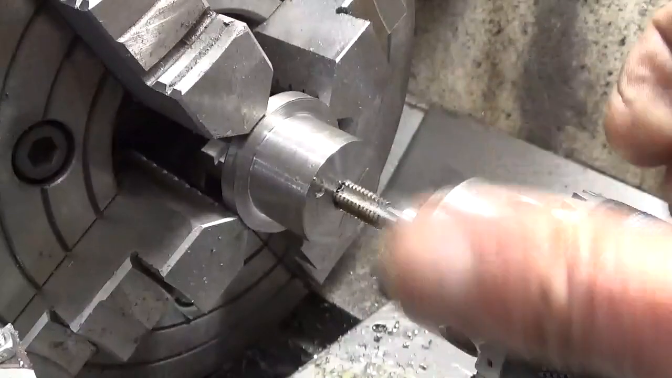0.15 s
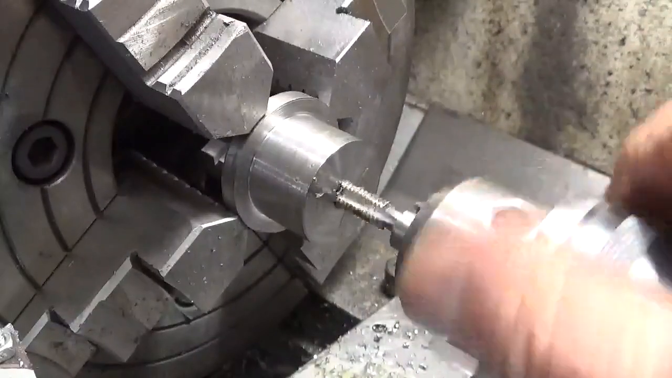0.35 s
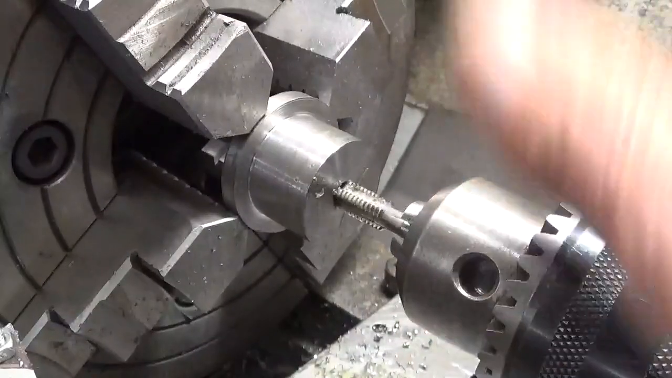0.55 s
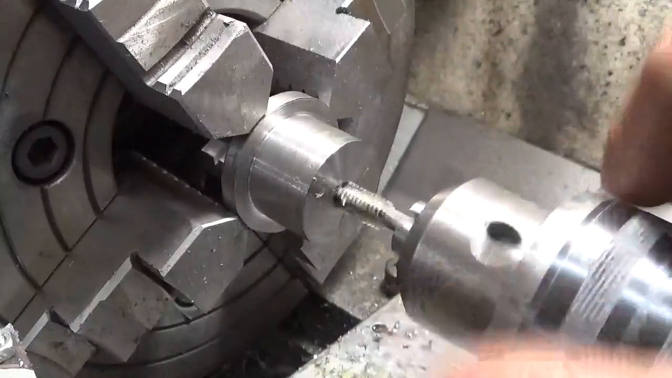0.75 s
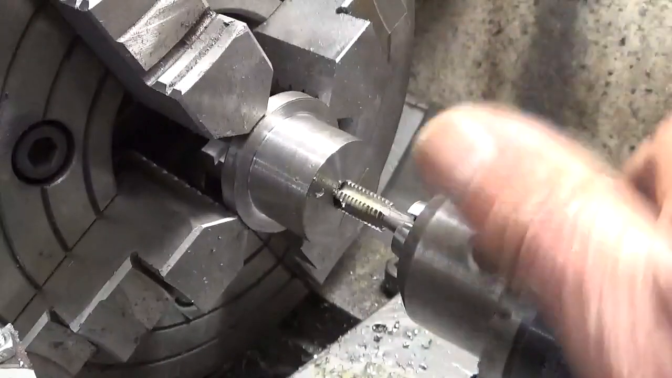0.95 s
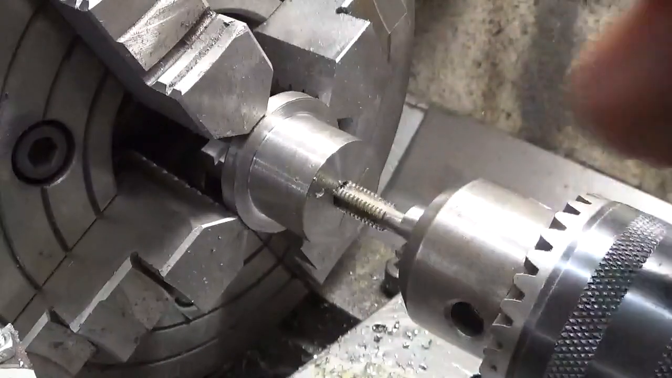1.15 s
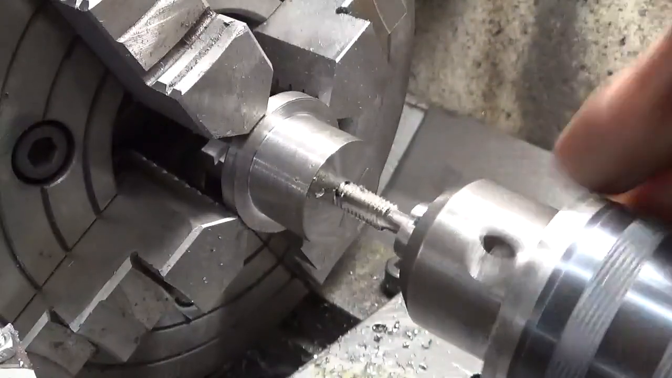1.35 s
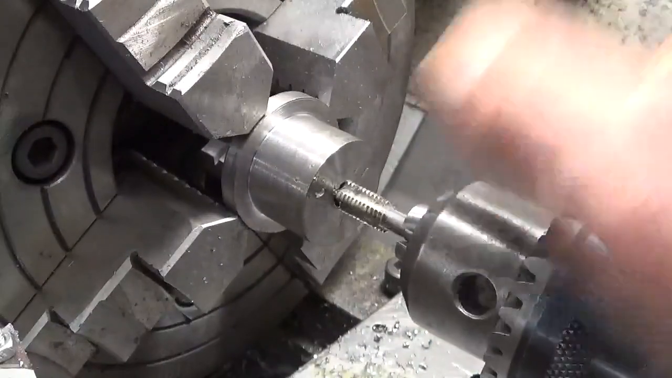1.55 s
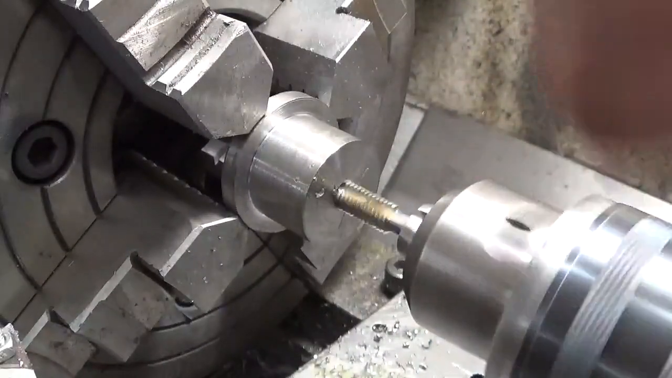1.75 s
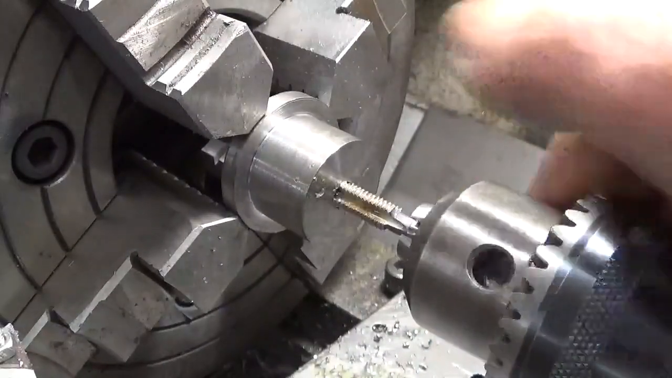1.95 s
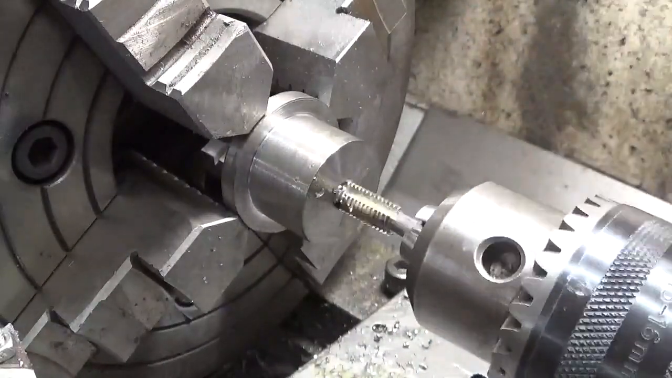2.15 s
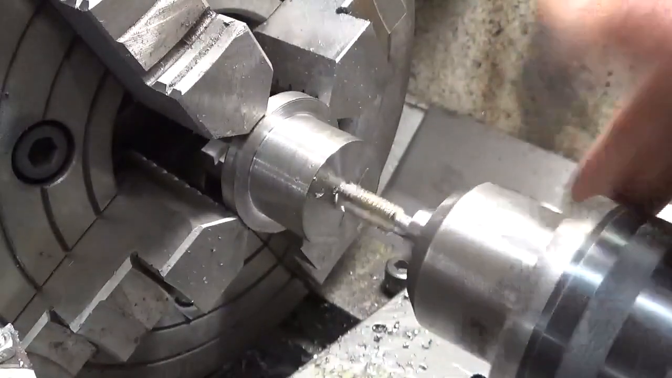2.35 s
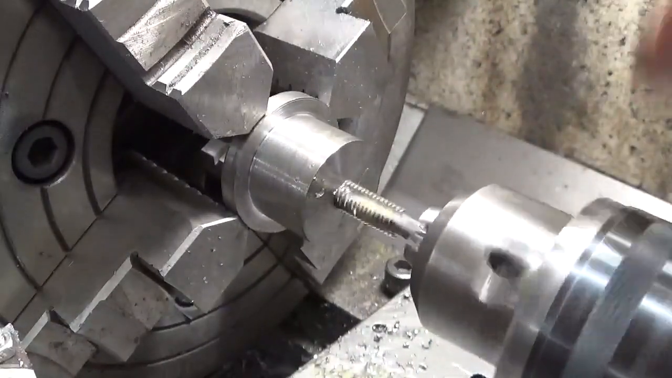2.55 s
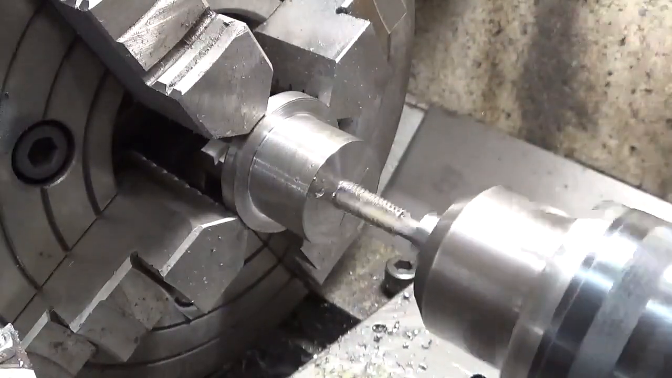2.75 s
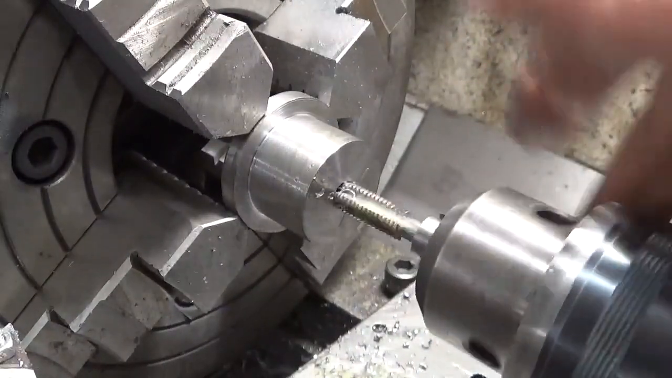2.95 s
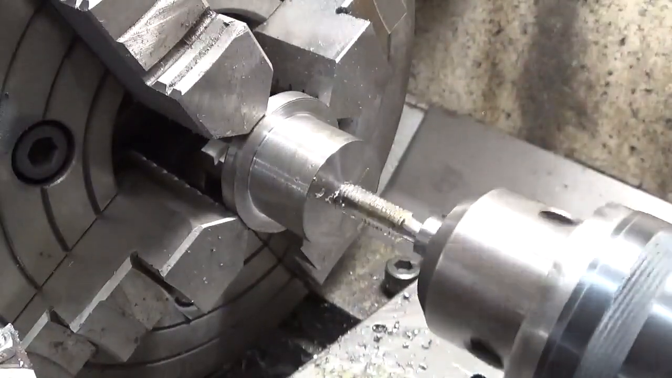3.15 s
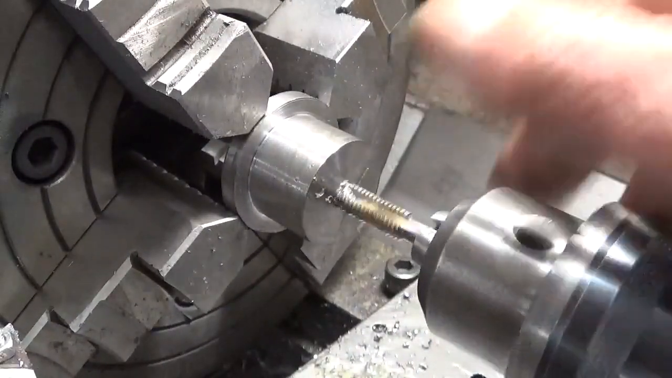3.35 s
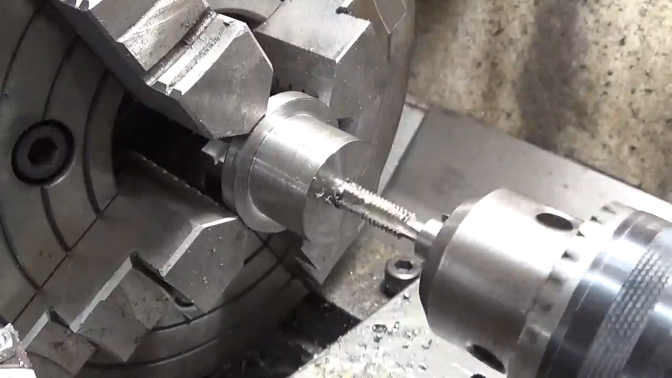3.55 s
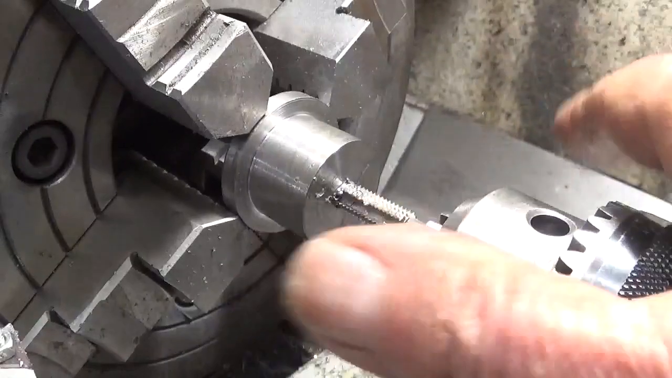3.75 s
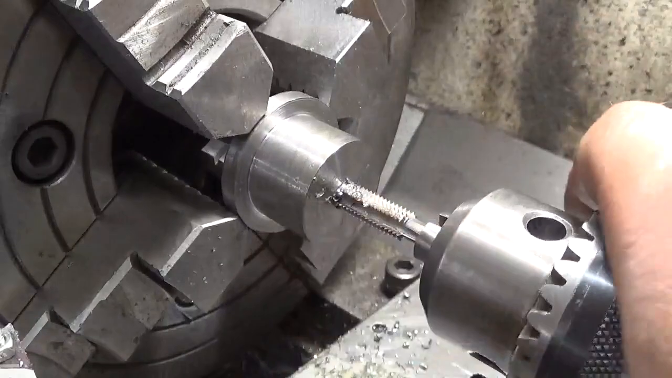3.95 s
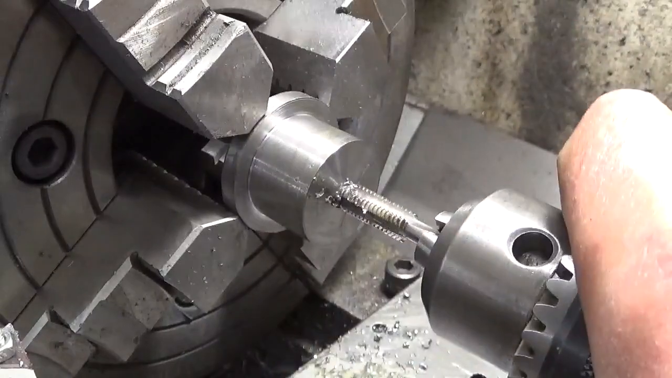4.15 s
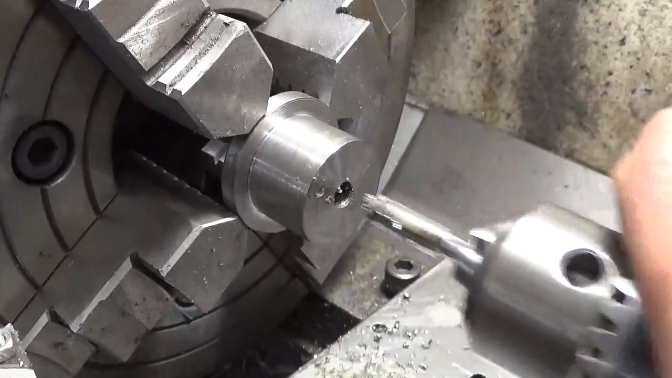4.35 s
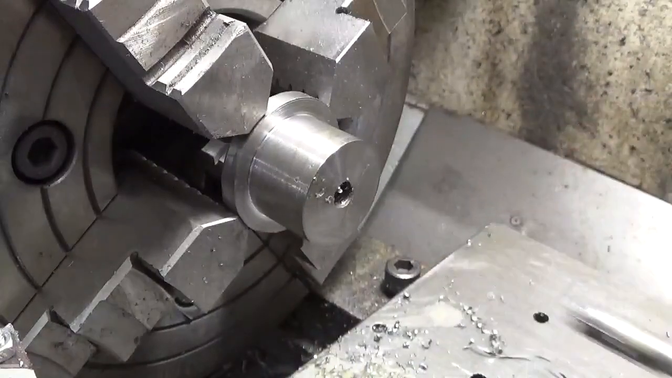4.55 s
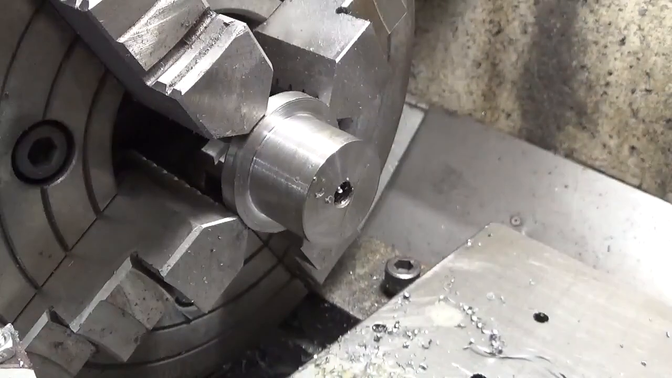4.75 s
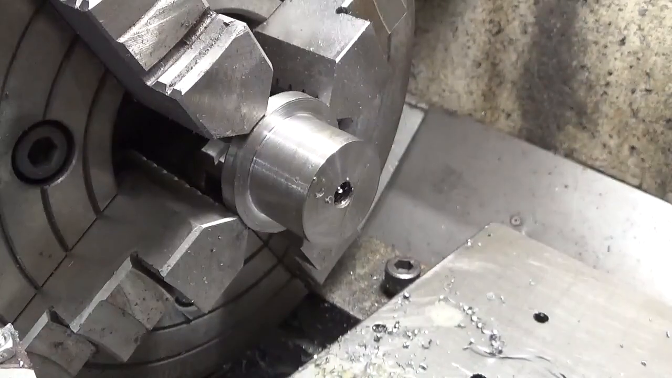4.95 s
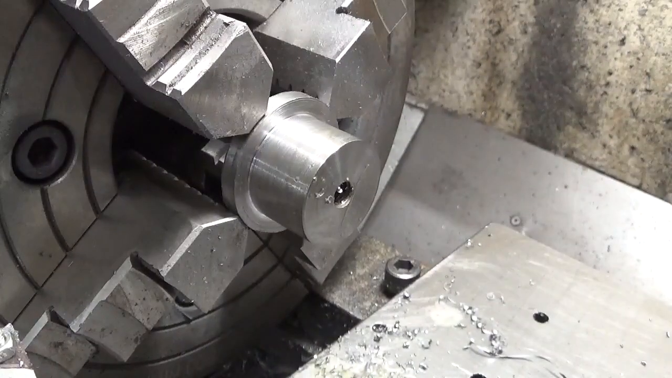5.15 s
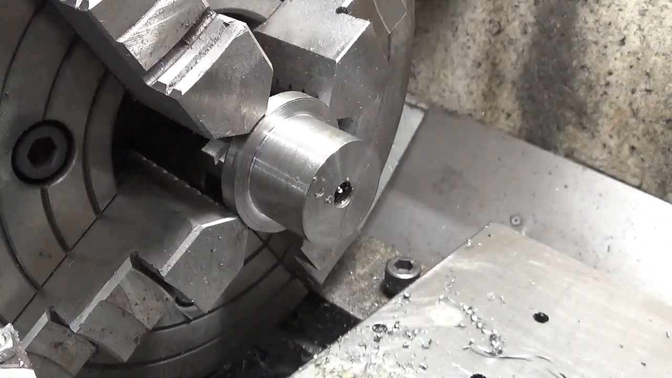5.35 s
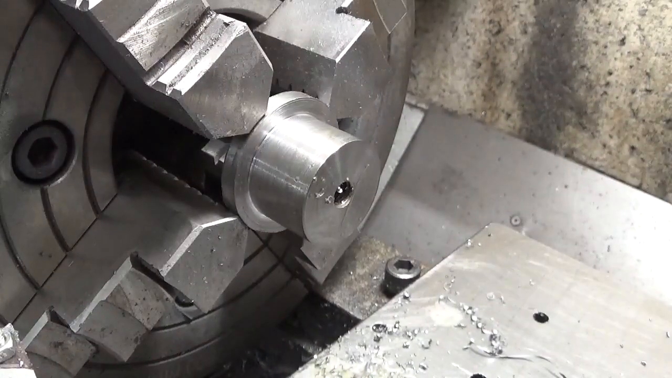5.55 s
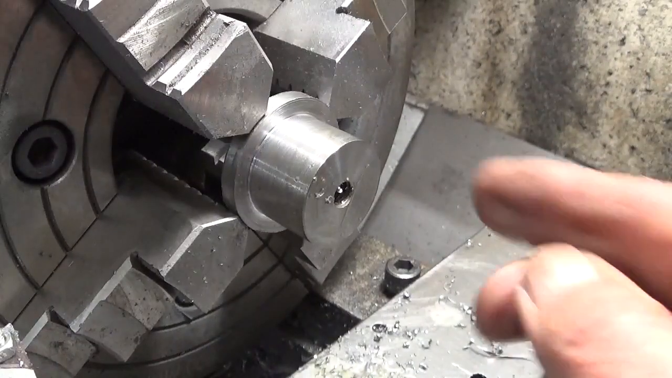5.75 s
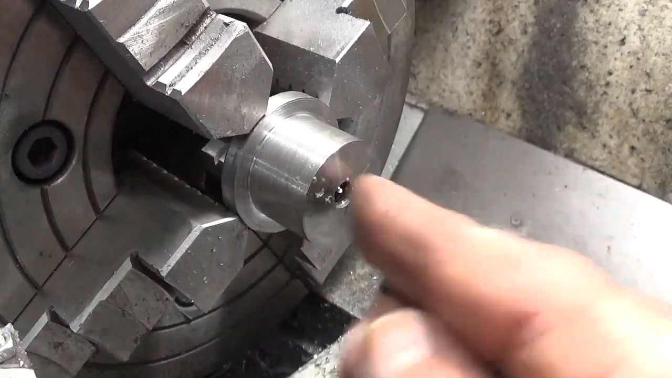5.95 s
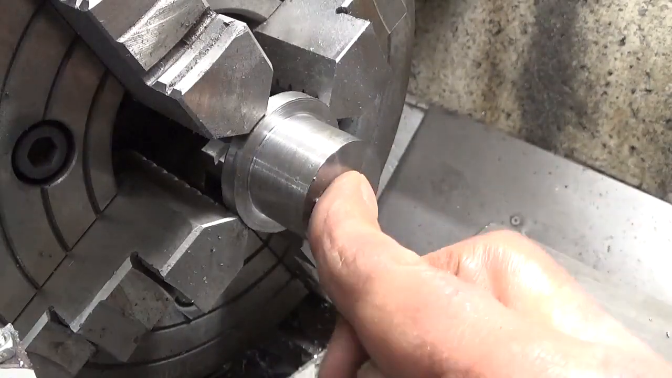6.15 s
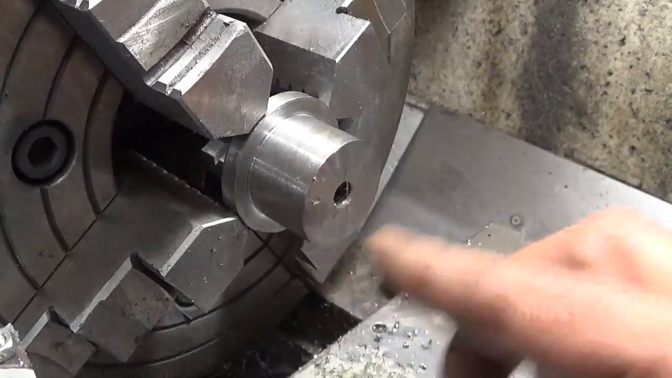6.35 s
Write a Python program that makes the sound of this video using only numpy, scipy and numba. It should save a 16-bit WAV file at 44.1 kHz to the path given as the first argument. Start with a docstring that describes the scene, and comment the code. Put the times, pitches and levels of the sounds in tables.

```python
"""A quiet workshop: fingers flick a drill chuck round to back a tap out of a part held in a lathe.
Close to a small camera, each flick slaps the steel (bursts of tiny slips ring the chuck and tap) and
rubs it (filtered grit); the tap squeaks, the machine bed rumbles and a thin whine wavers. Then the
tailstock slides away and knocks against its stop, and a finger touches the part. Air and hiss go on."""
import sys
import numpy as np
from scipy import signal
from scipy.fft import rfft, irfft
from scipy.io import wavfile
from scipy.ndimage import uniform_filter1d
from numba import njit

SR = 44100
rng = np.random.default_rng(int(sys.argv[2]) if len(sys.argv) > 2 else 0)


def master(y):
    """Save y as 16-bit WAV."""
    cut = np.clip(np.atleast_2d(y).T, -1, 1)
    pcm = np.round(cut * 32767)  # scale
    wavfile.write(sys.argv[1], SR, pcm.astype(np.int16))


def boost(x):
    """Linear amplitude factor 10**(x/20) for a level x in decibels (scalar or array-like)."""
    u = np.asarray(x, float) / 20
    return 10 ** u


N = 286550
TIME = np.arange(N) / SR
HZ = np.fft.rfftfreq(N, 1 / SR)

# A mode is one pitch at which a thing rings; its fade time is how long it takes to drop by 60 dB.
# Colour of the still air and hiss: (frequency [Hz], relative level per Hz [dB])
SHOP_COLOUR = [(15, -46), (25, -5), (70, -7), (108, 1.5), (221, -12), (317, -7), (389, -9), (420, -6),
               (490, -13.5), (931, -11.5), (2470, -14.5), (2660, -16.5), (3190, -15.5), (10600, -21.5),
               (11500, -35.5), (15000, -64), (22000, -120)]
# How alike the air is left and right: (frequency [Hz], correlation [0-1])
LIKENESS = [(130, 0.98), (270, 0.78), (580, 0.06), (1230, 0), (2600, 0.5), (5500, 0.4), (11000, 0.66)]
# Strokes of skin over steel:
# (start [s], length [s], level at start [dB], level at end [dB], hiss centre [Hz])
STROKES = [(0.0, 0.018, -47, -58, 7380), (0.03, .07, -55, -56, 7500), (0.105, 0.078, -48, -48, 7800),
           (0.222, 0.0048, -43, -45.5, 6540), (0.29, .055, -54.5, -51, 7780),
           (0.354, 0.0061, -36.5, -36, 7830), (0.4, 0.082, -53, -39.5, 8000),
           (0.5, 0.092, -45.5, -58, 7600), (0.62, 0.081, -49.5, -43, 7450),
           (0.735, 0.08, -50.5, -38.5, 8100), (0.84, .07, -58, -62, 7700), (0.93, 0.052, -60, -52, 8000),
           (1.025, .11, -45.5, -41, 6900), (1.15, 0.092, -64, -53.5, 8000), (1.3, 0.13, -42, -48.5, 7600),
           (1.415, 0.043, -48.5, -38.5, 8300), (1.512, .01, -48.5, -52, 7820),
           (1.53, 0.056, -56.5, -62, 7900), (1.62, 0.11, -48.5, -42, 6300),
           (1.75, 0.035, -49.5, -43.5, 7600), (1.8, .18, -59.5, -65.5, 8100),
           (2.005, 0.12, -45.5, -50.5, 7500), (2.14, 0.099, -57, -67, 8000), (2.295, .03, -57, -59.5, 7600),
           (2.345, 0.13, -40.5, -44, 6600), (2.47, 0.23, -50, -60.5, 8900),
           (2.68, 0.097, -54.5, -44.5, 7800), (2.79, .16, -47, -53, 7200), (2.96, .036, -56, -46, 7500),
           (3.008, 0.096, -52, -46.5, 7900), (3.1, .19, -49, -67.5, 8000), (3.38, .06, -51, -56, 7780),
           (3.445, .032, -52, -49, 7000), (3.485, 0.054, -59, -48.5, 8400), (3.545, 0.16, -56.5, -71, 7800),
           (3.788, 0.084, -61.5, -50.5, 7600), (3.914, 0.047, -50.5, -43.5, 8300),
           (4.04, 0.085, -49, -46.5, 8400), (4.35, 0.23, -69, -55.5, 7100), (4.59, 0.4, -50, -58.5, 6800),
           (5.165, .07, -63, -58, 7800), (5.36, 0.27, -65.5, -68.5, 7750), (5.72, .28, -63.5, -73, 7600),
           (6.062, .008, -50.5, -50, 7050), (6.28, 0.033, -59, -36.5, 8590)]
# A fingertip rasps over the rim of the part:
# (start [s], length [s], level at start [dB], level at end [dB], centre [Hz])
TOUCHES = [(6.052, 0.019, -47.5, -46, 3500), (6.272, .045, -50, -50, 3700)]
# Pushes that spin the chuck: (start [s], bed rumble [dB], fade as it coasts, negative swells [dB/s],
# drone above the rumble [dB], grind above the rumble [dB])
PUSHES = [(0.0, -42, 133, 4, -8), (0.198, -47, 80, 5.5, -2.5), (0.4, -49.5, 3, -1, -5),
          (0.505, -40.5, 136, -10, -4.5), (0.633, -49, 53, 1.5, -6), (0.838, -44, 147, 0.5, -2),
          (1.005, -38.5, 145, 3, -4), (1.115, -42.5, 130, 2.5, -7.5), (1.31, -43, 117, 2, -5),
          (1.43, -53.5, 70, 4.5, -0.5), (1.61, -56, -8, -0.5, -2), (1.77, -48.5, 200, -7, -6),
          (1.87, -56, 100, -1, -8.5), (2.005, -49, 69, 14, 1.5), (2.1, -52.5, 82, 6.5, -4),
          (2.345, -37.5, 130, 3, -4.5), (2.475, -47, 64, -5, -12), (2.675, -36.5, 47, -3.5, -12.5),
          (2.82, -39.5, 15, -8, -14), (2.925, -35, 76, -8.5, -20), (3.085, -42, 108, -6.5, -12.5),
          (3.2, -54, 33, -4, -7.5), (3.369, -41, 100, -3, -7), (3.46, -49, 104, -11, -3),
          (3.55, -56.5, 14, -12, -1.5), (4.16, -54, 150, -5, -10)]
# Squeaks of the tap: (start [s], length [s], level at start [dB], level at end [dB], pitch [Hz])
SQUEAKS = [(0.012, .005, -46, -50, 3260), (0.055, .08, -58, -65, 3070), (0.218, 0.0046, -56, -53, 3220),
           (0.362, .006, -49.5, -50, 3260), (0.5, 0.081, -43.5, -65, 3070), (0.65, .006, -56, -53, 3180),
           (0.845, .05, -54, -71, 3070), (1.005, .1, -54, -60, 3070), (1.122, 0.032, -48, -69, 3040),
           (1.457, .006, -50, -49, 3030), (1.72, .06, -61, -60, 3070), (1.78, .04, -55, -64, 3070),
           (2.01, .07, -57, -70, 3070), (2.102, 0.046, -55, -62, 3080), (2.338, .06, -47, -61, 2900),
           (2.41, 0.074, -60, -53, 3070), (2.485, 0.083, -53, -68, 3100), (2.69, 0.1, -54, -49, 3020),
           (2.81, .03, -48, -50, 3150), (2.87, .02, -39, -55, 2960), (2.91, .16, -50, -51, 3195),
           (3.088, .008, -46, -43, 2900), (3.128, 0.018, -47.5, -51.5, 2900), (3.178, .01, -55, -54, 2880),
           (3.36, .04, -51, -58, 2900), (3.415, .012, -52, -51, 2900), (3.54, .03, -53, -55, 3150),
           (3.594, .006, -42, -47.5, 3005)]
# Modes of the machine bed: (frequency [Hz], relative level [dB], fade time [s])
BED = [(183.5, 1, 0.093), (229.5, 2.5, 0.036), (310, -1.5, 0.094), (346, -2.5, 0.085), (433.4, -0.5, 0.041),
       (486.8, -5, 0.11), (553, -5, 0.057), (618, -9.5, 0.038), (716, -8.5, 0.04), (964, -16, 0.071)]
# Modes of the chuck, which the hand damps at once: (frequency [Hz], relative level [dB], fade time [s])
CHUCK = [(798, 2, 0.022), (1268, 3.5, 0.022), (1580, 13.5, 0.011), (1899, 6, 0.013), (2233, 3, .01),
         (2810, 0.5, 0.0024), (3260, 5.5, 0.009), (3950, 6, 0.0028), (4380, -4.5, 0.0072),
         (5415, -4.5, 0.0074), (5660, -2, 0.0065), (7100, 8, 0.0037), (7400, -12.5, 0.0027),
         (8300, 11.5, 0.0022), (9190, -8, 0.0021), (10110, -13.5, 0.0019)]
# Modes of the tap, which rings on freely: (frequency [Hz], relative level [dB], fade time [s])
TAP = [(1585, -9, 0.15), (2928, -6, 0.07), (3070, 4.5, 0.12), (3225, -18, 0.06)]
# Thumps that ring the bed:
# (time [s], peak [dB], two lowest modes above that [dB], hardness [dB/octave])
THUMPS = [(0.009, -35, 3.5, 10), (0.174, -26, -30, 12), (0.45, -35.5, -16, 15), (0.5, -23.5, -13, 9),
          (0.809, -27.5, -4.5, 5), (0.993, -31, -3, 0), (1.123, -38, -18, 15), (1.299, -36.5, 3.5, -10),
          (1.442, -43, -11, 11), (1.779, -44, -7, 6), (1.991, -22, 4.5, -16), (2.328, -28, -1.5, 5),
          (2.449, -32.5, -18, 15), (2.661, -19, 2.5, -4), (2.76, -27.5, 2, 5), (2.856, -18.5, -2.5, 9),
          (2.991, -34, 1.5, -19), (3.36, -28.5, -1, 5), (3.469, -45, -5, 4), (4.578, -7.5, -39, 19.5),
          (4.585, -7.5, -36, 10), (4.611, -16, -23, 1), (4.665, -18, -16, 7), (6.322, -45, -7.5, 24)]
# Slow jolts up through the stand: (time [s], peak [dB], pitch [Hz])
JOLTS = [(0.009, -32, 101), (0.309, -38, 78), (0.45, -41, 59), (0.609, -40.5, 89), (0.809, -35.5, 92),
         (0.992, -37.5, 113), (1.123, -35, 54), (1.299, -40.5, 35), (1.442, -48, 70), (1.779, -41.5, 71.6),
         (1.991, -24, 130), (2.111, -35.5, 59), (2.328, -35, 126), (2.449, -39, 73), (2.66, -30, 108),
         (2.76, -42, 48), (2.991, -35.5, 105), (3.068, -40, 35), (3.469, -44, 48)]
# Contacts on steel: (time [s], peak near 3 kHz [dB], low ring above that [dB],
# high ring above that [dB], contact length [s])
CONTACTS = [(0.0108, -24.5, -33, 9, 0.003), (0.078, -41.5, -16, 6.5, .0064), (0.1735, -13, 1, -1, .0055),
            (0.2216, -30, 2, -3.5, 0.006), (0.453, -35, 4, 0, 0.013), (0.478, -14.5, -5, 6.5, .013),
            (0.619, -50, -12, 8, .005), (0.6462, -40, -8, 16.5, 0.008), (0.738, -52, -10, 15, .0074),
            (0.795, -31, 2, 4, 0.026), (0.821, -22.5, 3.5, 8.5, 0.0087), (0.986, -33.5, 6.5, 9, .003),
            (0.9913, -15, -35, 8, 0.0078), (1.095, -27, 4, -2, 0.0066), (1.121, -26, -4, 4, 0.011),
            (1.176, -47, -9, 12.5, .014), (1.3025, -32, 1, -0.5, .012), (1.452, -30, -3.5, -1.5, .012),
            (1.782, -37, -1.5, 6.5, 0.0089), (1.9915, -19.5, -1, 3.5, .011), (2.102, -38, -3, 7, 0.0088),
            (2.3305, -21, -33, 12.5, 0.0079), (2.451, -40, -1, 9, 0.014), (2.659, -28.5, 10.5, -13, 0.016),
            (2.6623, -16, -18, 5, .012), (2.719, -37.5, -10, 5, .01), (2.753, -37, -13, 5.5, 0.016),
            (2.816, -37.5, -21, -10, 0.0065), (2.848, -17.5, -8.5, 0, 0.011), (2.932, -31.5, -1, 9, 0.0036),
            (2.984, -29.5, -30, -7, .0037), (3.084, -35, -26, 4, 0.013), (3.3538, -33.5, 1, 7, 0.015),
            (3.3794, -35.5, -2, -9, 0.015), (3.468, -34.5, -17, 2.5, 0.0077),
            (3.5483, -42, -24, -13, 0.011), (3.591, -39.5, -30, 1.5, 0.0061),
            (4.5762, -18, 1.5, -7.5, 0.0092), (4.9436, -23.5, 0, -11, 0.0053),
            (6.0538, -29.5, -21, -4.5, 0.0067), (6.064, -38.5, -28, -13, 0.0068),
            (6.269, -48, -14, -8, .014), (6.2832, -41, -21.5, -2, 0.0099), (6.3064, -37, -11.5, -6, 0.0058)]
# Bands of the low, middle and high chuck ring: (lower edge [Hz], upper edge [Hz])
RING_BANDS = [(650, 2600), (1900, 5600), (4400, 15000)]
# Faint whine as the chuck coasts: (time [s], pitch [Hz], level [dB])
WHINE = [(3.5, 3980, -67), (3.82, 3900, -69), (4.05, 3950, -75)]
# The tailstock sliding on its ways: (time [s], rumble [dB], scrape [dB])
SLIDE = [(4.25, -72, -79), (4.39, -54, -55.5), (4.49, -45, -46), (4.56, -40.5, -41.5), (4.6, -20.5, -39),
         (4.64, -29, -38.5), (4.7, -33.5, -47.5), (4.85, -49, -54), (4.9, -44.5, -56), (4.97, -50.5, -48),
         (5.042, -50, -58.5), (5.14, -61, -73), (5.36, -69.5, -71), (5.75, -65.5, -72), (5.9, -75, -78)]
# Colour of the scrape along the ways: (frequency [Hz], relative level per Hz [dB])
WAYS = [(530, -31.5), (900, -0.5), (1310, -3.5), (1500, -5), (3270, -9), (5450, -16), (6420, -14.5),
        (9000, -26.5), (11700, -53.5), (19800, -120)]
# Balance of the near sources: (frequency [Hz], left minus right [dB])
PORTS = [(60, -1), (110, 2), (190, 0), (350, 0), (630, -1.5), (1130, -3), (2030, -5), (3640, -3),
         (6550, -3), (11800, 0.5)]


def set_rms(x, db=0):
    """Scales a sound to an average (rms) level in dB."""
    return x * boost(db) / np.sqrt(np.mean(x ** 2))


def set_peak(x, db):
    """Scales a sound so that its largest sample has this level in dB."""
    return x * boost(db) / np.abs(x).max()


def at_hz(points):
    """Reads a (frequency, value) table at every frequency, on a logarithmic scale."""
    hz, value = np.transpose(points)
    return np.interp(np.log(HZ + 1), np.log(hz), value)


def colour(x, db):
    """Raises or lowers every frequency by its own number of dB."""
    return irfft(rfft(x) * boost(db), N)


def band(x, low_hz, high_hz):
    """Keeps the sound between two frequencies."""
    return signal.sosfilt(signal.butter(2, [low_hz, high_hz], "band", fs=SR, output="sos"), x)


@njit
def moving_band(x, hz, width_hz):
    """State-variable band-pass whose centre may move every sample."""
    y, band_state, low_state = np.empty(len(x)), 0., 0.
    for i in range(len(x)):
        g, k = np.tan(np.pi * hz[i] / SR), width_hz / hz[i]
        v = (band_state + g * (x[i] - low_state)) / (1 + g * (g + k))
        band_state = 2 * v - band_state
        low_state += 2 * g * v
        y[i] = k * v
    return y


def columns(table):
    """Reads a curve table over time; adds a switch that is on while the table lasts."""
    s, *values = np.transpose(table)
    on = (TIME > s[0]) & (TIME < s[-1])
    return [np.interp(TIME, s, v) for v in values] + [on]


def swells(rows, rise_db_s, fall_db_s):
    """Each row rises, slides between its levels and falls; gives summed gain and power-weighted pitch."""
    power, pitch = np.full(N, 1e-16), np.full(N, 1e-16 * rows[0][4])
    for s, length, first_db, last_db, hz in rows:
        # leave room for 60 dB of rise and of fall
        start = max(int((s - 60 / rise_db_s) * SR), 0)
        span = slice(start, int((s + length + 60 / fall_db_s) * SR))
        t = TIME[span] - s
        db = np.interp(t, [0, max(length, .001)], [first_db, last_db])
        db = db - rise_db_s * np.maximum(-t, 0) - fall_db_s * np.maximum(t - length, 0)
        row_power = boost(2 * db)
        power[span] += row_power
        pitch[span] += row_power * hz
    return np.sqrt(power), pitch / power


def walk(rate):
    """Random levels, rate of them a second, smoothed twice; spread near 1."""
    k = int(SR / rate)
    steps = np.repeat(rng.standard_normal(N // k + 1), k)
    return 1.3 * uniform_filter1d(uniform_filter1d(steps, k), k)[:N]


def grit(shape, share, spread_db):
    """Tiny slips on a share of the samples, a few far larger than the rest."""
    happens = rng.random(shape) < share
    return happens * rng.standard_normal(shape) * boost(spread_db * rng.exponential(size=shape))


def rings(modes, seconds):
    """One decaying sine per mode, as rows."""
    hz, db, t60 = np.array(modes).T[:, :, None]
    t = np.arange(int(seconds * SR)) / SR
    return boost(db) * np.exp(-np.log(1000) * t / t60) * np.sin(2 * np.pi * hz * t)


def harder(modes, tilt_db):
    """A harder push favours the upper modes by so many dB an octave."""
    return [(hz, db + tilt_db * np.log2(hz / modes[0][0]), t60) for hz, db, t60 in modes]


def rumble(modes, share, spread_db, low_hz):
    """Dense slips keep a set of modes ringing, here at rms 1."""
    ringing = signal.fftconvolve(grit(N, share, spread_db), rings(modes, .3).sum(axis=0))[:N]
    return set_rms(band(ringing, low_hz, 15000))


def add(out, s, sound):
    """Mixes a sound in at a time in seconds."""
    i = max(int(s * SR), 0)
    out[i:i + len(sound)] += sound[:N - i]


def shop():
    """Still air and microphone hiss are coloured noise; the bass is nearly the same left and right."""
    like = np.clip(at_hz(LIKENESS), 0, 1)
    mid, side = (rfft(rng.standard_normal(N)) * boost(at_hz(SHOP_COLOUR)) for _ in range(2))
    # more middle and less side makes the two channels more alike
    mid, side = irfft(mid * np.sqrt(1 + like), N), irfft(side * np.sqrt(1 - like), N)
    return set_rms(np.array([mid + side, mid - side]), -58) * boost(0.62 * walk(1.2))


def rub():
    """Skin ridges hiss at a pitch that follows the stroke, the finger pad rustles lower, a fingertip rasps."""
    stroke, ridge_hz = swells(STROKES, rise_db_s=899.5, fall_db_s=800)
    skin = boost(1.6 * walk(60)) * grit(N, .3, 1.1)
    ridges = set_rms(band(moving_band(skin, ridge_hz + 600 * walk(30), 2500.), 6300, 15000))
    pad_db = -7.5 + 0.97 * walk(90)  # relative to the hiss
    pad = boost(pad_db) * set_rms(band(skin, 2400, 4960))
    touch, touch_hz = swells(TOUCHES, rise_db_s=4000, fall_db_s=1500)
    rasp = set_rms(band(moving_band(grit(N, 0.091, 3.3), touch_hz, 1400.), 2100, 7000))
    return touch * rasp + stroke * (ridges + pad)


def turn():
    """The thread drags: the bed drones and rumbles, low chuck modes grind, the tap squeaks near 3 kHz."""
    push_s = 0.0095  # time a push takes
    squeak_reach_hz, squeak_flutter_db = 95, 2.5
    pushes = np.array(PUSHES)
    latest = np.maximum(np.searchsorted(pushes[:, 0], TIME) - 1, 0)
    s, db, fade, drone, grind = pushes[latest].T
    spin_db = db - fade * (TIME - s)  # the chuck coasts until the next push
    levels_db = [spin_db, spin_db + drone, spin_db + grind]
    bed_db, drone_db, grind_db = uniform_filter1d(levels_db, int(push_s * SR) + 1)
    bed_drone = boost(drone_db) * rumble(BED[:2], 0.039, 1.0, 87)
    bed_rumble = boost(bed_db + 0.83 * walk(25.71)) * rumble(harder(BED[2:], 0.5), .05, 1.9, 180)
    chuck_grind = boost(grind_db + 0.43 * walk(30)) * rumble(CHUCK[:5], .1, 0.83, 700)

    squeal, squeak_hz = swells(SQUEAKS, rise_db_s=698, fall_db_s=600)
    squeak = np.zeros(N)
    # the squeak jumps between the modes of the tap: those nearest its pitch sound loudest
    for mode in TAP[1:]:
        nearness = np.exp(-((squeak_hz - mode[0]) / squeak_reach_hz) ** 2)
        squeak += nearness * rumble([mode], .03, 1.7, 2340)
    flutter = boost(squeak_flutter_db * walk(60))
    return bed_drone + bed_rumble + chuck_grind + squeal * flutter * set_rms(squeak)


def thumps():
    """A soft push rings the bed, and a slow jolt comes up through the stand."""
    out, push = np.zeros(N), -np.hanning(int(0.0011 * SR))
    # each thump weighs the modes afresh
    weights = boost(3.5 * rng.standard_normal((len(THUMPS), len(BED))))
    for (s, db, deep_db, tilt_db), weight in zip(THUMPS, weights):
        modes = rings(harder(BED, tilt_db), .3)
        upper = np.convolve(weight[2:] @ modes[2:], push)
        deep = np.convolve(weight[:2] @ modes[:2], push)
        add(out, s, set_peak(band(upper, 300, 3000), db))
        add(out, s, set_peak(band(deep, 200, 1000), db + deep_db))
    for s, db, hz in JOLTS:
        jolt = -rings([(hz, 0, 0.098)], .2)[0]
        add(out, s, set_peak(jolt, db))
    return out


def contacts():
    """Each contact is a few ms of slips; the grip shifts and weighs the modes of the chuck afresh."""
    press_share = 0.22  # share of a contact spent pressing on
    tap_ring_db = -13.5  # relative to the 3 kHz peak of a contact
    early_s = .0004  # each sound starts this much before its listed time
    out, t, tap = np.zeros(N), np.arange(2048) / SR, rings(TAP, .2).sum(axis=0)
    group = np.digitize(np.array(CHUCK)[:, 0], (2200, 5000))  # low, middle or high modes
    slips = grit((len(CONTACTS), len(t)), .4, 2.2)
    chance = rng.standard_normal((len(CONTACTS), 2, len(CHUCK)))
    for (s, db, low_db, high_db, length), slip, (weight, shift) in zip(CONTACTS, slips, chance):
        length = max(length, .001)
        # pressure builds up, stays, and lets go abruptly
        press = slip * np.exp(-(t / length) ** 3) * np.minimum(t / (press_share * length), 1)
        gripped = [(hz + 1.5 * d / t60, mode_db + 2 * w, t60)
                   for (hz, mode_db, t60), w, d in zip(CHUCK, weight, shift)]
        modes = rings(gripped, .04)
        for k, ring_db in enumerate((low_db, 0, high_db)):
            ring = signal.fftconvolve(press, modes[group == k].sum(axis=0))
            add(out, s - early_s, set_peak(band(ring, *RING_BANDS[k]), db + ring_db))
        tap_ring = signal.fftconvolve(press, tap)
        add(out, s - early_s, set_peak(tap_ring, db + tap_ring_db))
    return out


def whine():
    """The coasting chuck's whine is noise filtered twice into a thin band that wavers in pitch."""
    hz, db, on = columns(WHINE)
    thin = moving_band(moving_band(rng.standard_normal(N), hz, 150.), hz, 300.)
    return on * boost(db) * set_rms(thin)


def slide():
    """Heavy iron scrapes along the ways, shakes the upper modes of the bed and booms into the floor."""
    bed_db, scrape_db, on = columns(SLIDE)
    bed = boost(bed_db + 0.66 * walk(40)) * rumble(harder(BED[2:-1], 5.0), .1, 1.2, 310)
    scrape = boost(scrape_db + 1.2 * walk(30)) * set_rms(colour(grit(N, .2, 1.9), at_hz(WAYS)))
    # the floor answers the knock: up at 150 dB/s to its loudest, then down at 50 dB/s
    boom_s, boom_peak_db = 4.68, -48
    boom_db = boom_peak_db - np.maximum(150 * (boom_s - TIME), 50 * (TIME - boom_s))
    boom = boost(boom_db) * set_rms(band(rng.standard_normal(N), 60, 93))
    return on * (bed + scrape + boom)


def room(x):
    """Nearby steel and walls scatter a short tail, different in each channel above the bass."""
    t60_s, room_db = 0.07, -11.5
    t = np.arange(int(.4 * SR)) / SR
    tail = rng.standard_normal((2, len(t))) * np.exp(-np.log(1000) * t / t60_s) * (t > .001)
    tail = band(tail, 360, 9000)
    tail = tail * boost(room_db) / np.sqrt(np.sum(tail ** 2) / 2)
    return signal.fftconvolve(x[None], tail, axes=1)[:, :N]


def scene():
    """Sums the near sources, spreads them left and right, and adds their room tail and the shop air."""
    near = rub() + turn() + thumps() + contacts() + whine() + slide()
    half_db = at_hz(PORTS) / 2
    stereo = np.array([colour(near, half_db), colour(near, -half_db)])
    return stereo + room(near) + shop()


def band_limit(x):
    """A steep low-pass at the top of the band."""
    return signal.sosfilt(signal.butter(12, 12370, fs=SR, output="sos"), x)


def record(dry):
    """The treble is cut steeply above 11050 Hz."""
    mix = signal.sosfilt(signal.ellip(8, .3, 40, 11050, fs=SR, output="sos"), dry)
    return band_limit(mix)


dry = scene()
out = record(dry)
master(out)
```